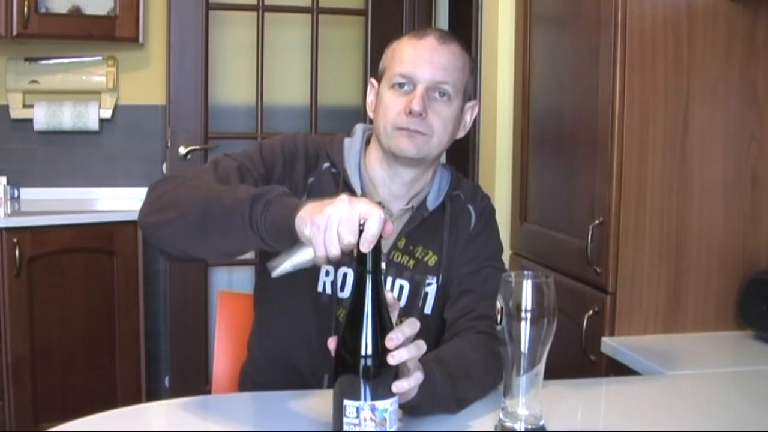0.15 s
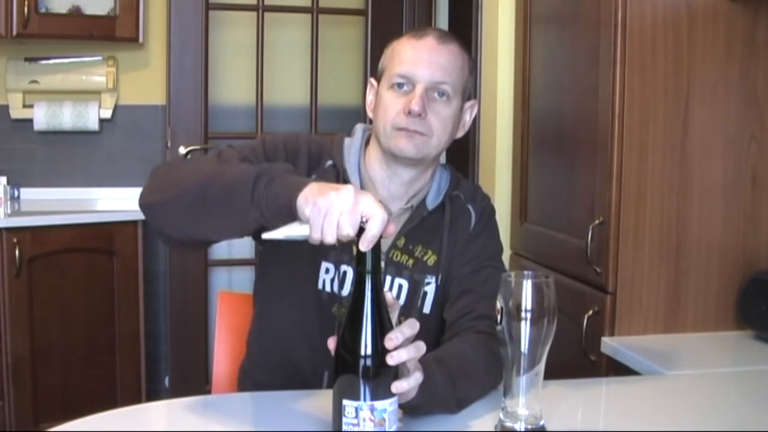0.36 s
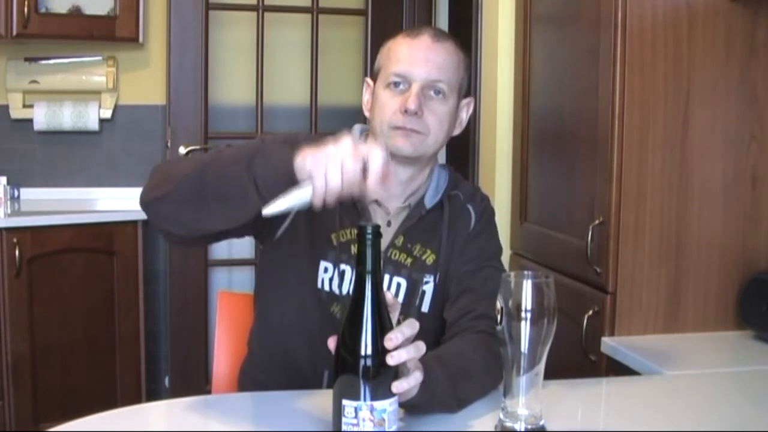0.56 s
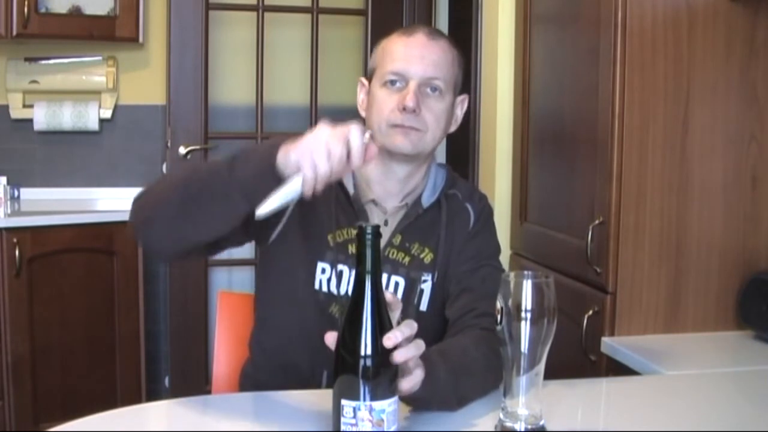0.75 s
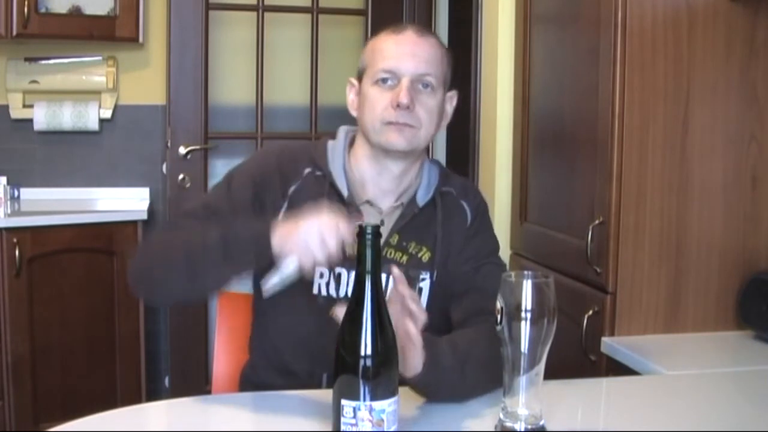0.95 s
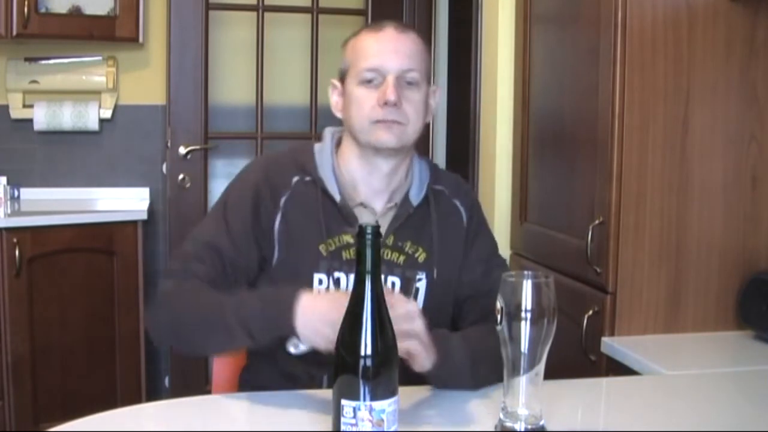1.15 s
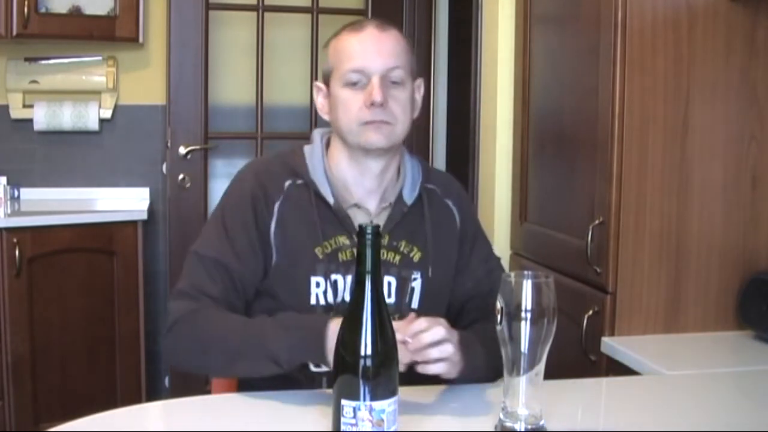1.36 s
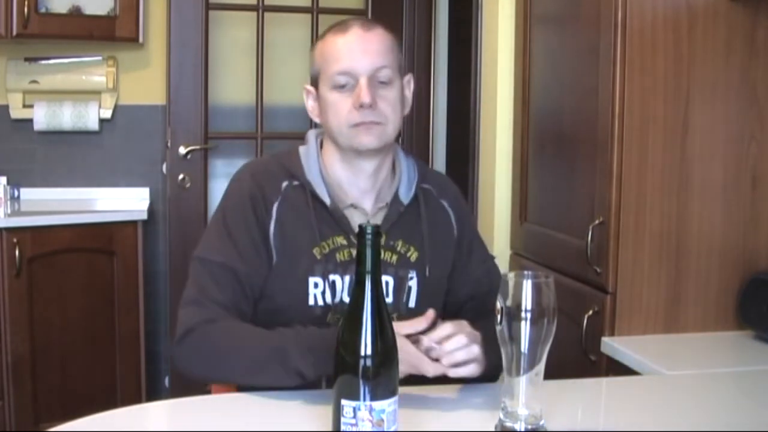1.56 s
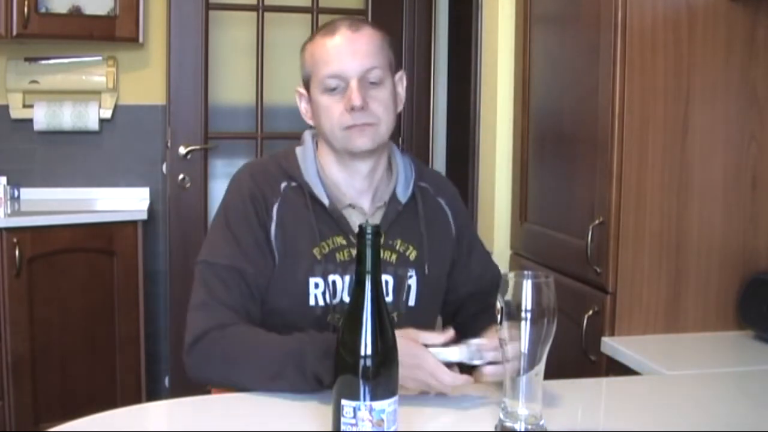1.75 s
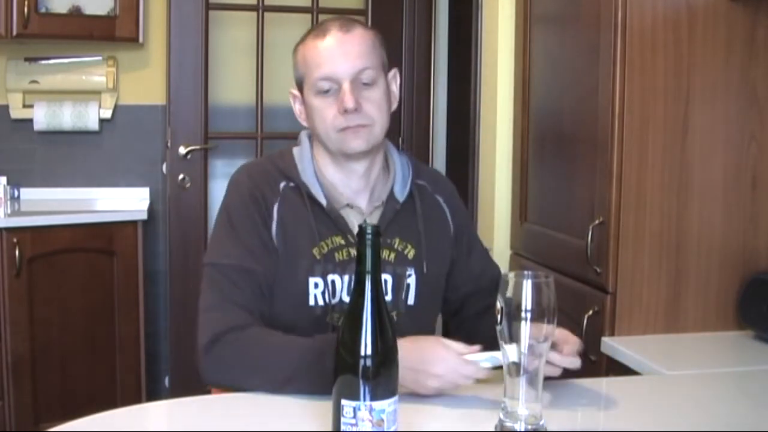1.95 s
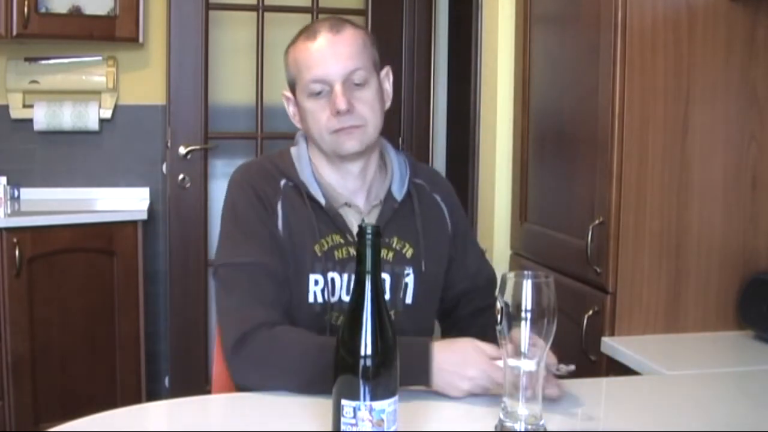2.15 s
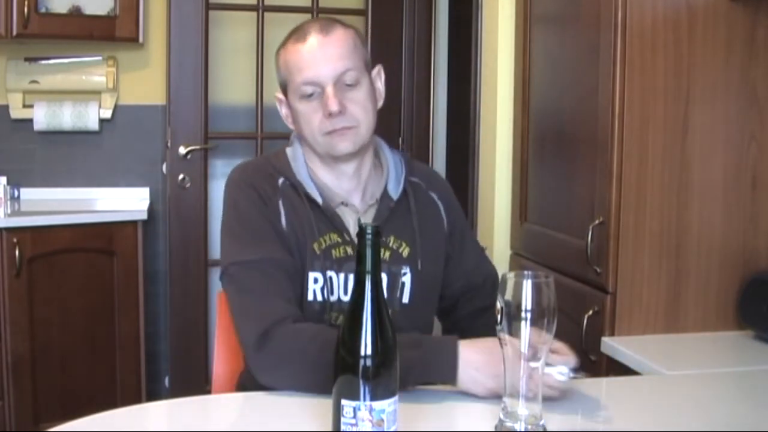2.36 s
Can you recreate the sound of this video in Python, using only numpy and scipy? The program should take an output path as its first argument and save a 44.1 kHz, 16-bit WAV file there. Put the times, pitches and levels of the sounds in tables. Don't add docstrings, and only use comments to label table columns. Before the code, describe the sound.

A crown cap is levered off a glass bottle with a sharp, hollow, gassy pop and a table thump; then steel cap and opener click in the hands and are laid on the table, close microphone, hard-walled kitchen.

```python
import sys
import numpy as np
from scipy import signal
from scipy.fft import rfft, irfft, next_fast_len
from scipy.io import wavfile

SR = 44100
rng = np.random.default_rng(int(sys.argv[2]) if len(sys.argv) > 2 else 0)


def magnitude_from_level(level_db):
    exponent = np.asarray(level_db, float) / 20
    return 10 ** exponent


def dump_mix(stems):
    frames = np.atleast_2d(stems).T
    limited = np.clip(frames, -1, 1)
    pcm = np.round(limited * 32767).astype(np.int16)
    wavfile.write(sys.argv[1], SR, pcm)


N = 110250
POP_S = 0.248


def unit(x):
    return x / np.sqrt(np.mean(x ** 2) + 1e-20)


def along(points, hz):
    f, value = np.transpose(points)
    return np.interp(np.log(hz + 1), np.log(f + 1), value)


def curve(rows):
    return np.interp(np.arange(N) / SR, *np.transpose(rows))


def filtered(x, response):
    n = x.shape[-1]
    padded = 2 * next_fast_len(n // 2 + SR // 8)
    return irfft(rfft(x, padded) * response(np.fft.rfftfreq(padded, 1 / SR)), padded)[..., :n]


def ring(f, hz, width):
    return 1j * f * width / (hz * hz - f * f + 1j * f * width)


def rings(table):
    return lambda f: sum(magnitude_from_level(db) * ring(f, hz, width) ** 2 for hz, width, db in table)


def causal(gain):
    def response(f):
        cepstrum = irfft(np.log(np.maximum(np.abs(gain(f)), 1e-6)))
        cepstrum[1:len(f) - 1] *= 2
        cepstrum[len(f):] = 0
        return np.exp(rfft(cepstrum))
    return response


def pair(x, alike):
    turn = np.arccos(np.clip(alike, -1, 1)) / 2
    shared, opposed = np.cos(turn) * x[0], np.sin(turn) * x[1]
    return np.array([shared + opposed, shared - opposed])


def add(out, s, x):
    part = out[:, round(s * SR):][:, :x.shape[-1]]
    part += x[..., :part.shape[1]]


# (frequency [Hz], decay to -60 dB [s])
ROOM = [(100, 0.6), (300, 0.69), (1000, .6), (3000, 0.55), (7000, .42), (15000, 0.29)]
BUILD_S, ROOM_ALIKE = 0.0037, 0.79
WALLS_DB, WALLS_S = 2.5, 0.04


def room(x):
    hz, t, z = signal.stft(rng.standard_normal((2, SR)), SR, nperseg=256)
    decay = magnitude_from_level(-60 * t / along(ROOM, hz)[:, None])
    tail = signal.istft(z * decay, SR, nperseg=256)[1]
    t = np.arange(tail.shape[1]) / SR
    strength = np.minimum(rng.exponential(size=len(t) // 16 + 1), 4) - 1
    walls_db = WALLS_DB * np.exp(-t / WALLS_S) * np.repeat(strength, 16)[:len(t)]
    build = 1 - np.exp(-(t / BUILD_S) ** 2)
    tail = pair(tail * magnitude_from_level(walls_db) * build, ROOM_ALIKE)
    return signal.fftconvolve(x[None], tail / np.linalg.norm(tail[0]), axes=1)[:, :SR]


# (frequency [Hz], level [dB per Hz])
GAS = [(35, -40), (150, -24), (1000, -17.5), (3500, -19.5), (5500, -10), (8500, -5.5), (12000, -10.5),
       (16000, -25)]
# (frequency [Hz], level [dB per Hz])
GAS_WALLS = [(35, -49.5), (100, -22), (330, -41.5), (900, -29.5), (1500, -9.5), (3800, -11), (9000, -8.5),
             (16000, -22.5)]
# (frequency [Hz], width [Hz], level [dB])
NECK = [(170.9, 21, 2), (252, 30, -6.5), (520, 68, -2), (720, 150, -4), (1070, 65, 0), (1330, 150, -18),
        (2007, 37, 0.5), (2630, 62, 7), (3150, 400, -9), (4070, 250, -10.5), (5820, 300, -11.5)]
# (frequency [Hz], level [dB], decay to -60 dB
# [s])
GLASS = [(179.4, -35, 1), (1132, -43.5, .3), (1996, -41, .3), (2560, -31, 0.45), (2620, -37, 0.51),
         (2650, -38, .4), (2683, -41.5, 0.33), (2940, -38.5, .3), (3380, -37, 0.294), (3395, -37, .4),
         (5300, -38, .3), (5690, -38.5, .2), (6231, -41.5, .2)]
RISE_S, BURST_T60 = 0.00045, 0.035
POP_DB, GAS_ROOM_DB, GLASS_ROOM_DB = -6.5, 2, -22


def pop():
    out = np.zeros((2, N))
    lead = 0.006
    t = np.arange(SR) / SR
    shape = np.where(t < lead, np.exp((t - lead) / RISE_S), magnitude_from_level(-60 * (t - lead) / BURST_T60))
    hiss = unit(filtered(rng.standard_normal((2, SR)), lambda f: magnitude_from_level(along(GAS, f))))
    jet = magnitude_from_level(POP_DB) * shape * pair(hiss, 0.85)
    impulse = 1.0 * (np.arange(SR) == round(lead * SR))
    blow = filtered(impulse, lambda f: magnitude_from_level(along(GAS_WALLS, f)) + np.abs(rings(NECK)(f)))
    blow = blow * (t > lead / 2)
    since = np.maximum(t - lead, 0)
    glass = sum(magnitude_from_level(db - 60 * since / t60) * np.sin(2 * np.pi * hz * since) for hz, db, t60 in GLASS)
    echo = magnitude_from_level(GAS_ROOM_DB + 33) * room(blow) + magnitude_from_level(GLASS_ROOM_DB) * room(glass)
    add(out, POP_S - lead, jet + 0.5 * glass + echo)
    return out


# (time [s], level [dB], frequency [Hz], decay to -60 dB [s])
THUMPS = [
    (0.254, -23, 108, 0.1),
    (.30, -53, 119, 0.084),
    (0.497, -31, 246, 0.15),
    (.52, -39.5, 80, 0.18),
    (.84, -58.5, 206, 0.92),
    (.88, -62, 720, 0.35),
    (1.76, -69, 748, 0.24),
]


def thumps():
    out, t = np.zeros((2, N)), np.arange(SR) / SR
    for s, db, hz, t60 in THUMPS:
        push = unit(filtered(rng.standard_normal((2, SR)), lambda f: ring(f, hz, 0.067 * hz) ** 2))
        swell = 1 - np.exp(-t / 0.01)
        add(out, s, magnitude_from_level(db - 60 * t / t60) * swell * pair(push, 0.9))
    return out


# (frequency [Hz], width [Hz])
CAP = [(1500, 720), (2050, 520), (2630, 820), (3250, 750), (4900, 500), (7750, 800), (8500, 1170),
       (13000, 2500)]
TOP_DB, FILL_DB = -12.5, -17


def steel(knock_db, rim_db, crimp_db):
    levels = [knock_db, -2, 0, knock_db + 3.5, rim_db, crimp_db, crimp_db - 2, crimp_db + TOP_DB]

    def gain(f):
        peaks = sum(magnitude_from_level(db) * np.abs(ring(f, *mode)) ** 3.5 for mode, db in zip(CAP, levels))
        return peaks + magnitude_from_level(FILL_DB) * np.abs(ring(f, 4200, 2500)) ** 2
    return gain


# (time [s], level [dB], dull knock [dB], rim [dB], crimp [dB])
CLICKS = [(0.838, -63.5, -4.5, -4, -10), (1.006, -56, -9, -8, -12.5), (1.05, -57.5, -12, -11, -25),
          (1.0973, -45.5, -6, -8.5, -7), (1.1588, -41.5, -9, -15, -19.5), (1.177, -50.5, -13, -6, -39),
          (1.229, -58, 0, -20, -25), (1.3137, -38.5, -17, -19, -12), (1.40, -53.5, -20, -1, -20),
          (1.568, -71, -12, 4, -0.5), (1.83, -69, -8.5, 0, -3)]
# (time [s], level [dB], room [dB])
CAP_DOWN = [
    (1.9446, -47.5, 7.5),
    (1.9485, -49, 6),
]
# (frequency [Hz], level [dB])
CAP_TABLE = [(300, -22), (700, -2.5), (1450, 5), (2300, -2.5), (3100, 0.5), (7100, -6), (9200, -1.5),
             (10200, -15), (16000, -10)]
# (time [s], level [dB], room [dB])
OPENER_DOWN = [
    (2.2447, -31.5, 7),
    (2.2673, -42, -1.5),
    (2.277, -48, -6),
]
# (frequency [Hz], level [dB])
OPENER_TABLE = [(400, -41), (800, -18.5), (1500, -9), (4200, -1.5), (5400, -17.5), (6500, -12.5),
                (9500, -24.5), (12500, -24), (16000, -34)]
# (frequency [Hz], width [Hz], level [dB])
OPENER = [(4920, 350, 5), (7840, 950, 0)]
CONTACT_S, RATTLE, CLICK_ROOM_DB = 0.00093, 0.08, 10.5
TABLE_ECHO_S, TABLE_ECHO = 0.0011, 0.8


def clicks():
    out, t = np.zeros((2, N)), np.arange(SR // 10) / SR
    cap_body = lambda f: magnitude_from_level(along(CAP_TABLE, f))
    opener_body = lambda f: magnitude_from_level(along(OPENER_TABLE, f)) + np.abs(rings(OPENER)(f))
    hits = [(s, db, CLICK_ROOM_DB, steel(*colour)) for s, db, *colour in CLICKS]
    hits += [(*row, cap_body) for row in CAP_DOWN]
    hits += [(*row, opener_body) for row in OPENER_DOWN]
    tap = t == 0
    echo = TABLE_ECHO * (t == t[round(TABLE_ECHO_S * SR)])
    for s, db, room_db, body in hits:
        rattle = RATTLE * np.exp(-t / CONTACT_S) * rng.standard_normal(len(t))
        hit, clean = filtered(np.array([tap + echo + rattle, tap]), causal(body))
        add(out, s - 0.0003, magnitude_from_level(db + 23) * hit / np.linalg.norm(hit))
        add(out, s - 0.0003, magnitude_from_level(db + 19.5 + room_db) * room(clean / np.linalg.norm(clean)))
    return out


def grit(response, spiky_db):
    grain_db = spiky_db * np.minimum(rng.exponential(size=N), 5)
    return unit(filtered(rng.standard_normal(N) * magnitude_from_level(grain_db), response))


# (time [s], level [dB])
SCRAPE = [
    (1.917, -107),
    (1.92, -62),
    (1.935, -58.5),
    (1.944, -47.5),
    (1.946, -79.5),
]
# (frequency [Hz], width [Hz], level [dB])
SCRAPE_RINGS = [(6310, 2500, 4), (2960, 1500, -3.5)]


def scrape():
    out = np.zeros((2, N))
    slide = magnitude_from_level(curve(SCRAPE)) * grit(rings(SCRAPE_RINGS), spiky_db=3)
    start = round(SCRAPE[0][0] * SR)
    add(out, start / SR, magnitude_from_level(3.5) * room(slide[start:][:SR // 4]))
    return out + slide


# (time [s], level [dB])
FIDGET = [(0.6, -90.5), (.85, -71), (1.0, -76.5), (1.08, -70), (1.3, -58.5), (1.5, -91.5), (1.85, -86),
          (2.5, -80)]


def fidget():
    rub = [grit(steel(-22.5, -23.5, -19), spiky_db=-2.0) for _ in "ab"]
    return magnitude_from_level(curve(FIDGET)) * pair(rub, ROOM_ALIKE)


# (frequency [Hz], width [Hz], level [dB])
HUM = [(56.7, 14, -73), (154.2, 25, -75.5), (205.7, 67, -70), (1030, 60, -78.5), (2580, 300, -74)]
# (frequency [Hz], width [Hz], level [dB])
WHINE = [(4150, 140, -83), (9300, 300, -84)]
# (time [s], level [dB])
WHINE_FADE = [
    (0, 1),
    (1.7, -0.5),
    (2.0, 5),
    (2.5, -9.5),
]


def fridge():
    def tones(lines):
        out = 0
        for hz, width, db in lines:
            tone = filtered(rng.standard_normal((2, N)), lambda f: ring(f, hz, width) ** 2)
            out = out + magnitude_from_level(db) * pair(unit(tone), 0.49)
        return out
    return tones(HUM) + magnitude_from_level(curve(WHINE_FADE)) * tones(WHINE)


# (frequency [Hz], level [dB per Hz])
AIR = [(15, -56), (25, -21), (48, -14), (157, -14.5), (256, -17.5), (394, -5), (1740, -17), (2610, -20.5),
       (16000, -36.5)]
# (frequency [Hz], likeness [-1 to 1])
ALIKE = [(60, 0.47), (240, -0.74), (950, -0.63), (3770, 0.41), (15000, 0.42)]
AIR_DB, HISS_TOP_HZ = -62.5, 15850


def air():
    def mid_side(f):
        turn = np.arccos(np.clip(along(ALIKE, f), -1, 1)) / 2
        return (f < HISS_TOP_HZ) * magnitude_from_level(along(AIR, f)) * [np.cos(turn), np.sin(turn)]
    mid, side = filtered(rng.standard_normal((2, N)), mid_side)
    return magnitude_from_level(AIR_DB) * unit(np.array([mid + side, mid - side]))


def scene():
    return pop() + thumps() + clicks() + scrape() + fidget() + fridge() + air()


def low_pass(x):
    return signal.sosfilt(signal.butter(12, 16620, fs=SR, output="sos"), x)


DUCK_DB, DUCK_S, RELEASE_S, RESTS_DB = -15, 0.0055, 0.14, 3
TOP = 0.5
LOW_CUT_HZ, MIC_TOP_HZ, BALANCE_DB = 25, 15900, -1


def record(dry):
    since = np.maximum(np.arange(N) / SR - POP_S, 0)
    duck = 1 - np.exp(-(since / DUCK_S) ** 2)
    gain_db = duck * (RESTS_DB + (DUCK_DB - RESTS_DB) * np.exp(-since / RELEASE_S))
    x = dry * magnitude_from_level(gain_db)
    x = x / (1 + np.abs(x / TOP) ** 4) ** 0.25

    def microphone(f):
        low_cut = (1j * f / (LOW_CUT_HZ + 1j * f)) ** 2
        return low_cut / (1 + (f / MIC_TOP_HZ) ** 40)
    x = filtered(x, microphone)
    return low_pass(x * magnitude_from_level([[BALANCE_DB / 2], [-BALANCE_DB / 2]]))


dry = scene()
out = record(dry)
dump_mix(out)
```